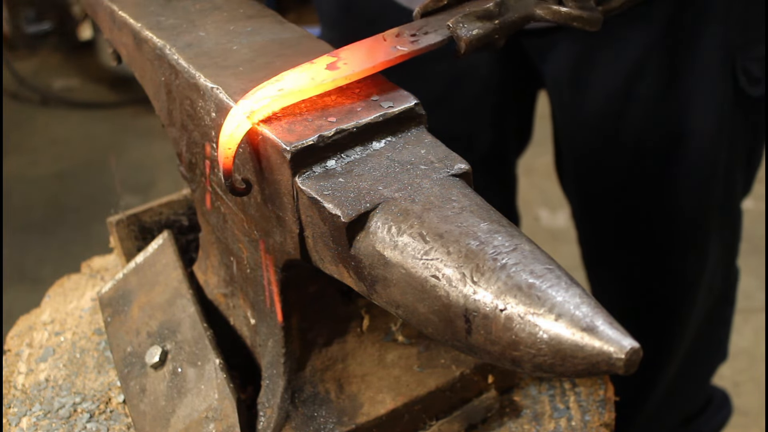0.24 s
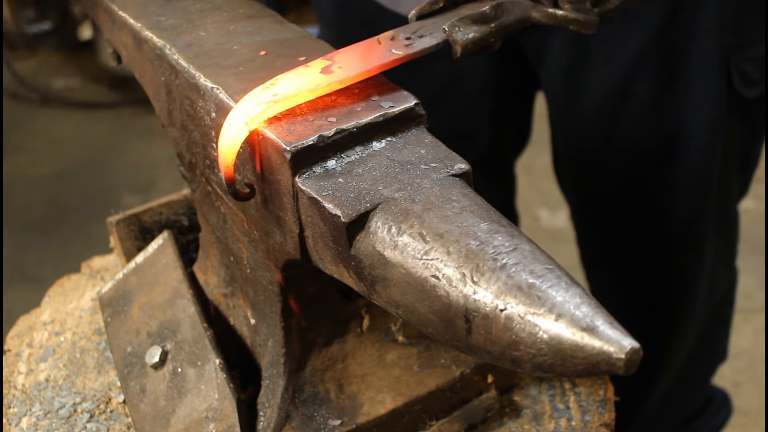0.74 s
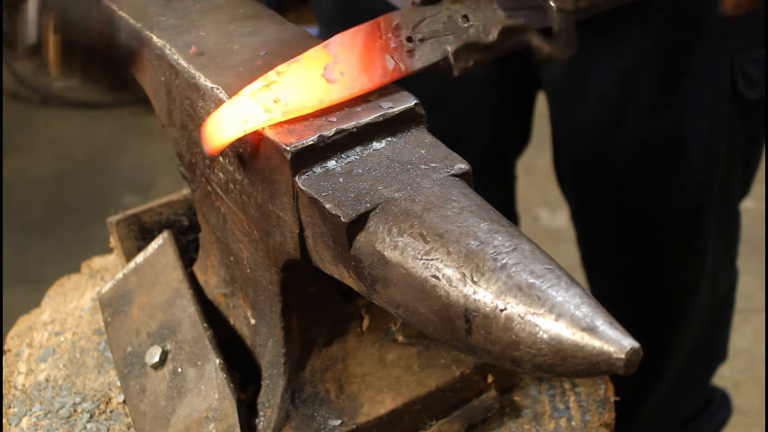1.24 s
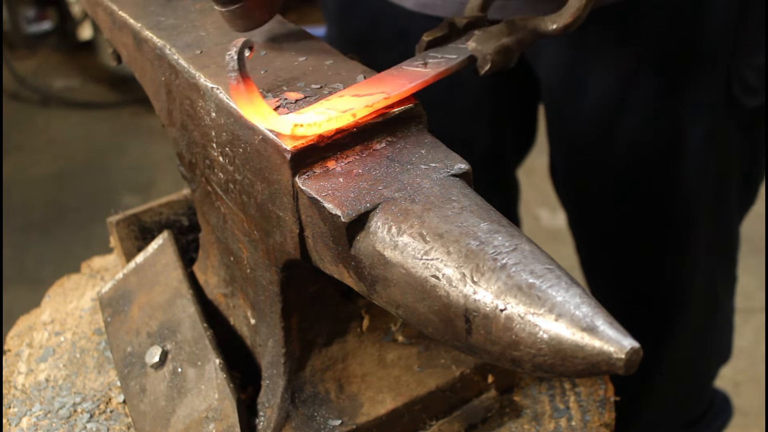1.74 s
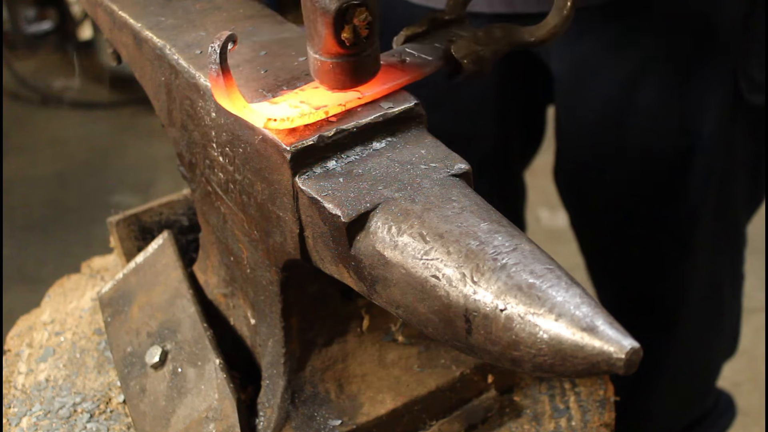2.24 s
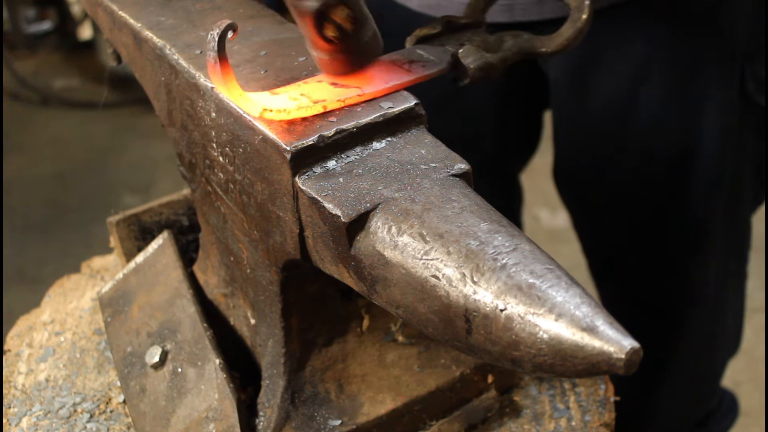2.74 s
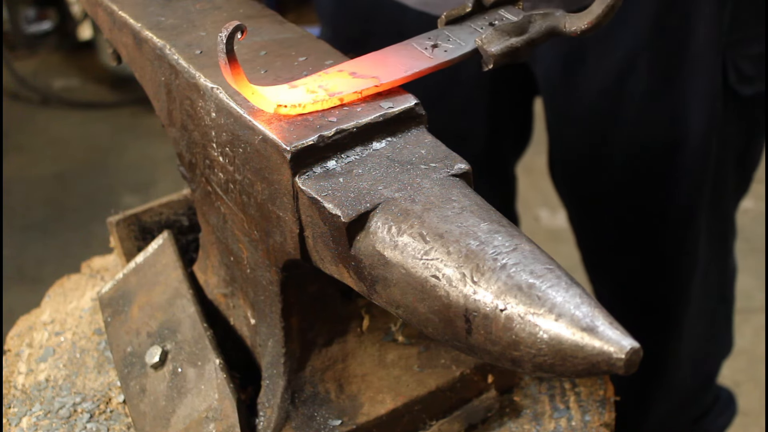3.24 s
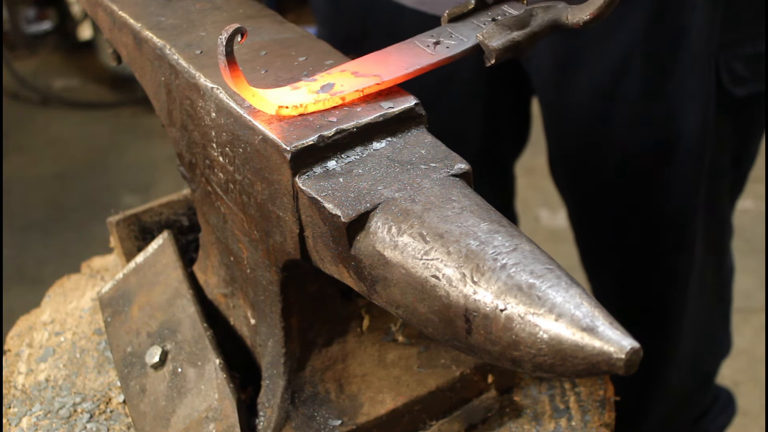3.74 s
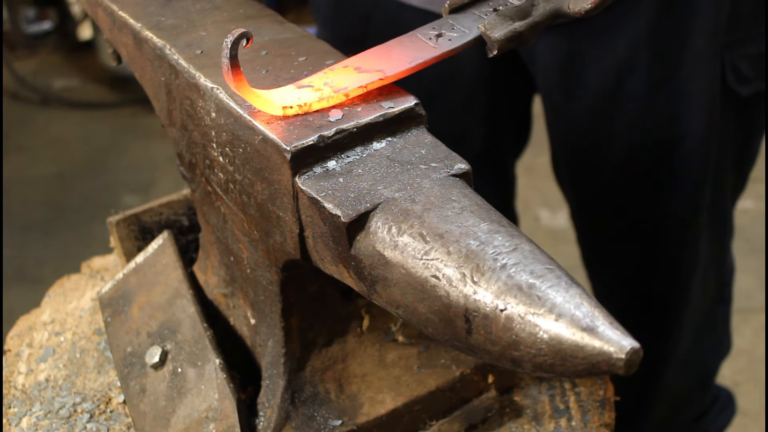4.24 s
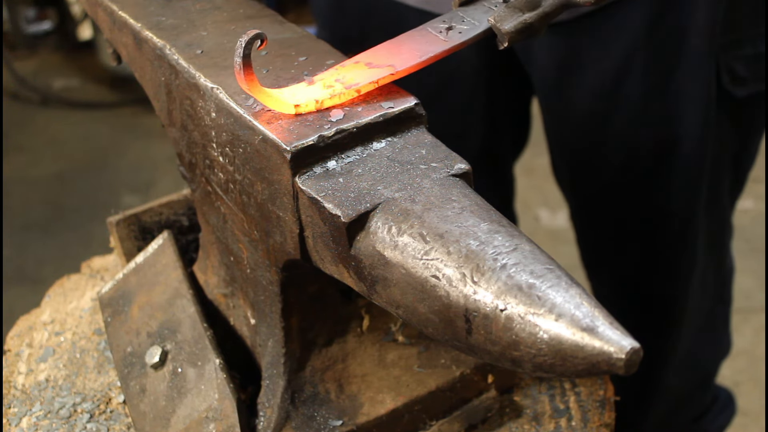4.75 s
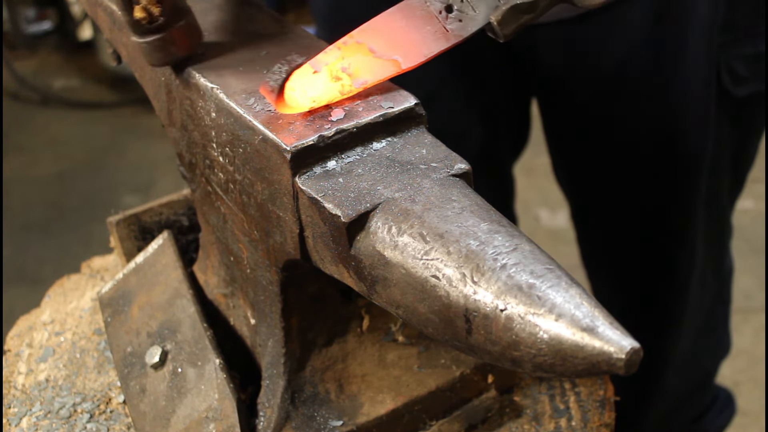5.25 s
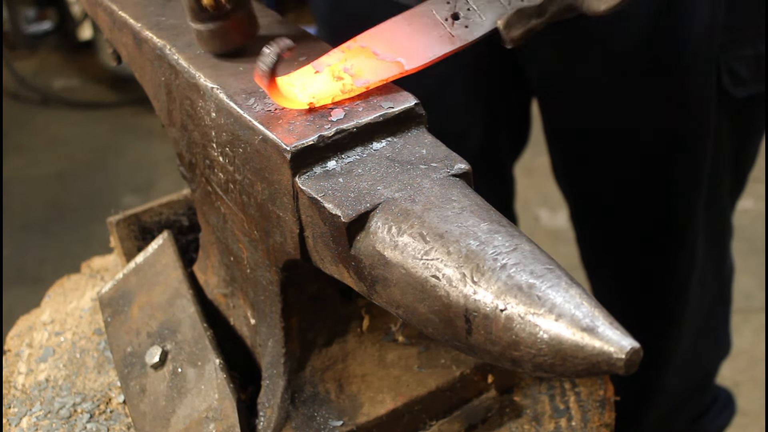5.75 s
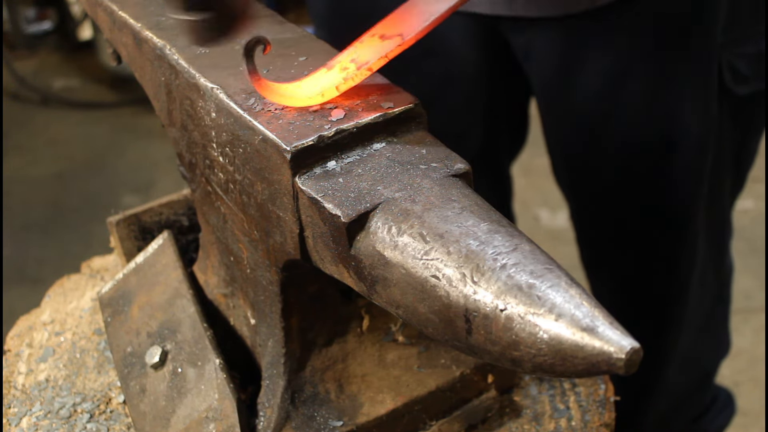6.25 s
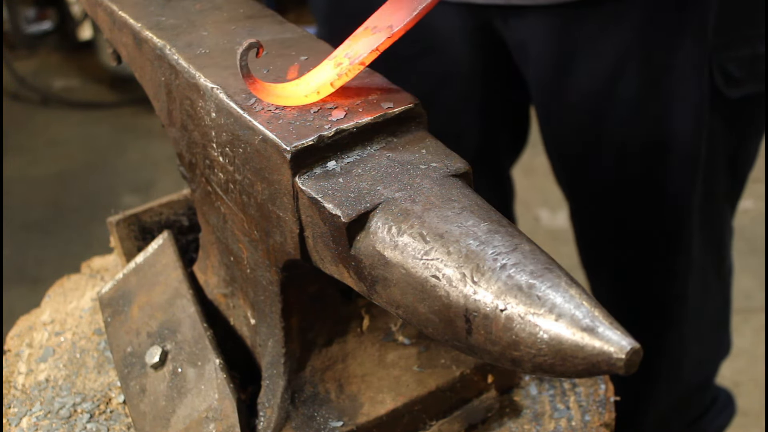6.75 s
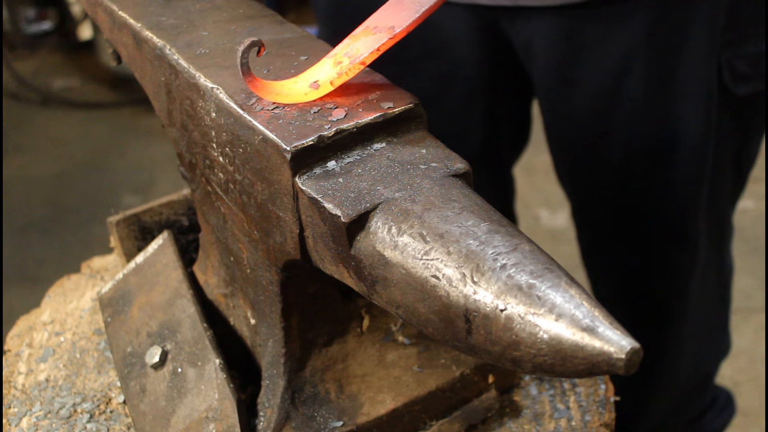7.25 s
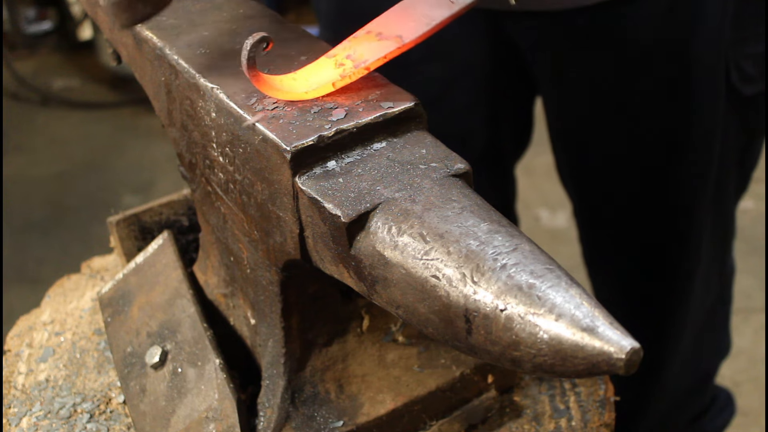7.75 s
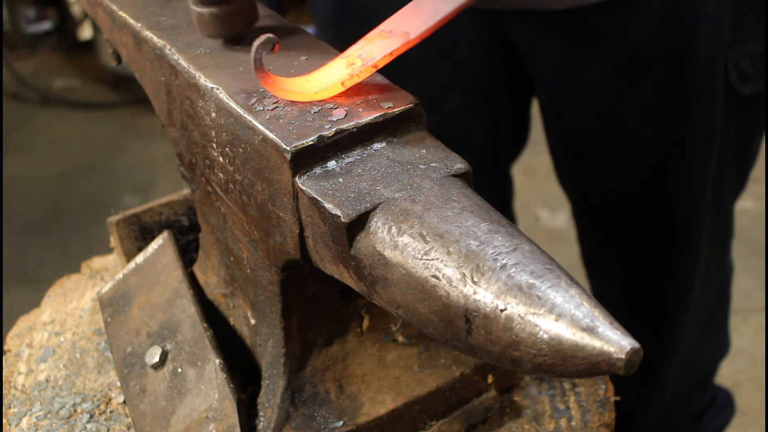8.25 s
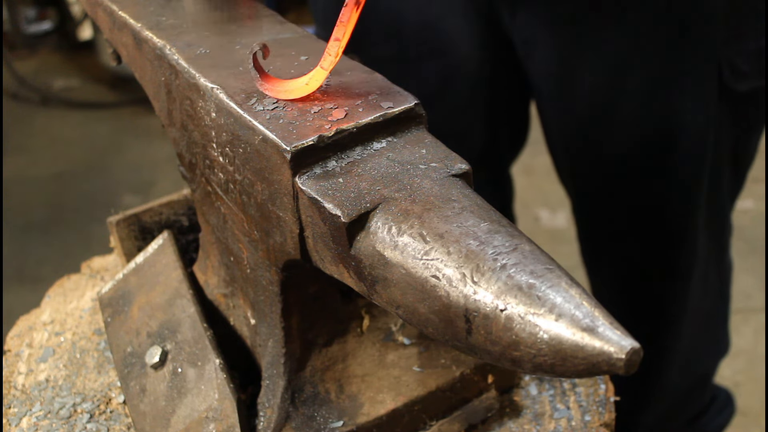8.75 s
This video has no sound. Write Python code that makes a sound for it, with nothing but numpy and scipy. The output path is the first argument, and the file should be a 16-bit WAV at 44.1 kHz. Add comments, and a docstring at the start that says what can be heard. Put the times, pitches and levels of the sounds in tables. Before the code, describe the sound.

A gas forge roars continuously, a low, fluttering, hollow rush around a few hundred hertz with a fainter hiss above. Over it, a hammer strikes hot steel at about 0.1, 0.6 and 1.1 seconds: hard, abrupt cracks with small bright clinks of loose steel around the first two. Two ringing taps on the bare anvil follow at 1.6 and 1.7, then a clear clink at 2.2 and a pause as the roar swells back. Four somewhat lighter blows fall at 3.5, 3.9, 4.4 and 4.9. A rapid, dulling bounce of taps comes at 5.2-5.4, with another tap at 5.7. Four stronger blows land at 6.3, 6.7, 7.1 and 7.6, then taps bounce at 7.95-8.15 and 8.35, before a last blow at 8.8. Rings are short and damped, with a brief hard-walled room tail. The close microphone distorts slightly on peaks, and the background ducks after loud hits.

```python
"""Small workshop: a hand hammer strikes hot steel on a damped anvil, and taps and bounces on the bare face.
Each contact is a coloured noise burst plus decaying modes of anvil and piece and a room tail; the loose
steel clinks too. A gas forge roars (noise through chamber resonances) and hisses (noise through a jet colour).
Loud peaks clip; a gain control ducks on overloads and creeps back up."""
import sys
import numpy as np
from scipy import signal
from scipy.fft import rfft, irfft, next_fast_len
from scipy.io import wavfile
from scipy.ndimage import uniform_filter1d, minimum_filter1d, map_coordinates

SR = 44100
rng = np.random.default_rng(int(sys.argv[2]) if len(sys.argv) > 2 else 0)


def transcribe(u):
    """Save the signal u as a 16-bit wav file named by the first command-line argument.

    u: samples, shape (n,) or (channels, n), limited to [-1, 1]; the rate is SR.
    q: integer samples, one column per channel.
    """
    v = np.clip(np.atleast_2d(u).T, -1, 1)
    q = np.round(v * 32767).astype(np.int16)
    wavfile.write(sys.argv[1], SR, q)


N = 397341

BURST_T60_S, TAP_T60_S = 0.014, 0.022  # blows and clinks; bare taps last longer


def amp(db):
    """Gain of a level in dB."""
    return 10 ** (np.asarray(db) / 20)


def unit(x):
    """x at rms 1."""
    return x / np.sqrt(np.mean(x ** 2) + 1e-20)


def along(points, hz):
    """Interpolate (Hz, value) points on a log frequency axis."""
    f, v = np.transpose(points)
    return np.interp(np.log(hz + 1), np.log(f + 1), v)


def wobble(rate_hz):
    """Smooth random curve with rate_hz knots a second."""
    knots = rng.standard_normal(int(N * rate_hz / SR) + 4)
    return map_coordinates(knots, [np.arange(N) * rate_hz / SR])


def filtered(x, response):
    """x times a gain response(Hz), zero phase."""
    m = next_fast_len(len(x) + 8192)
    return irfft(rfft(x, m) * response(np.fft.rfftfreq(m, 1 / SR)), m)[:len(x)]


def hump(hz, centre_hz, width_hz):
    """Shape of one resonance: 1 at its centre, half at the edges of its width."""
    return 1 / (1 + (2 * (hz - centre_hz) / width_hz) ** 2)


def lag(x, tau_s):
    """One-pole smoothing with time constant tau_s."""
    keep = np.exp(-1 / (abs(tau_s) * SR))
    return signal.lfilter([1 - keep], [1, -keep], x)


def octaves(hz, centre_hz):
    """Signed distance from centre_hz in octaves, constant under 1 kHz."""
    return np.log2(np.maximum(hz, 1000) / centre_hz)


def add(track, start_s, sound):
    """Mix a sound into the track at start_s."""
    track[round(start_s * SR):][:len(sound)] += sound


def patchy(patchy_db):
    """White noise with patches of random gain in time and frequency."""
    z = signal.stft(rng.standard_normal(N), nperseg=512)[2]
    field = uniform_filter1d(rng.standard_normal(z.shape), 5, 0)
    field = uniform_filter1d(field, 10, 1)
    return signal.istft(z * amp(patchy_db * unit(field)), nperseg=512)[1][:N]


def forge():
    """Turbulent flame excites the chamber's resonances; the gas jet adds broadband hiss."""
    # roar level over time: time_s, roar_db
    flame_levels = [(0, -9), (1.2, -6), (2.4, -11.5), (3.1, -8.5), (4.2, -6.5), (5, -10), (6, -8.5),
                    (6.6, -6), (7.5, -9.5), (9, -7)]
    # resonances of forge chamber and shop: centre_hz, nominal width_hz, level_db
    chamber_modes = [(105, 23.3, -12.5), (160.7, 32.3, -6), (215.2, 24.8, 2), (247.4, 5.5, 3.5),
                     (298.5, 39.6, 0), (335.4, 17, -2), (391, 90, -3), (457, 74, -5), (527.4, 29.8, -0.5),
                     (612, 22, -7.5), (640, 83, -10), (658, 27, -16), (757.4, 11, -10), (892, 23, -26)]
    # relative density of burner hiss: freq_hz, level_db (per Hz)
    jet_colour = [(410, -30.5), (700, -5), (1020, -13), (1120, -14), (1390, -14.5), (1800, -16),
                  (2110, -23.5), (2540, -25), (2750, -29), (3260, -29.5), (3620, -28), (7860, -36),
                  (11400, -34), (14800, -53), (16200, -52.5)]
    # resonances in the hiss: centre_hz, width_hz, lift_db
    throat_modes = [(1153, 210, 6), (1312, 23, 11), (1952, 210, 3), (2513, 70, 9), (3230, 300, 7),
                    (5500, 140, 4.5), (10400, 280, 4.5), (11600, 300, 6)]
    hiss_db, hiss_follows = -20.5, 0.63  # the hiss swings less than the roar

    def chamber(hz):
        # exponent steepens the skirts: dark valleys between resonances
        return np.sqrt(sum(amp(2 * db) * hump(hz, c, w) ** 1.84 for c, w, db in chamber_modes))

    def throat(hz):
        lift_db = sum(db * hump(hz, c, w) for c, w, db in throat_modes)
        return amp(along(jet_colour, hz) + lift_db)

    roar_db = np.interp(np.arange(N) / SR, *np.transpose(flame_levels))
    flutter_db = 0.26 * wobble(3.3) + 0.17 * wobble(40)  # the flame burns in lumps
    roar = unit(amp(flutter_db) * filtered(patchy(patchy_db=1.0), chamber))
    hiss = unit(amp(0.19 * flutter_db) * filtered(patchy(patchy_db=1.5), throat))
    return amp(roar_db) * roar + amp(hiss_db + hiss_follows * roar_db) * hiss


def echoes(t):
    """Fresh room tail of energy 1; each frequency dies at its own speed."""
    # decay of the shop: freq_hz, t60_s
    shop_decay = [(500, 0.17), (1200, 0.22), (2500, 0.25), (6000, 0.21), (11000, 0.19), (15000, 0.25)]
    hz, frame_s, z = signal.stft(rng.standard_normal(len(t)), SR, nperseg=256)
    decay = amp(-60 * frame_s / along(shop_decay, hz)[:, None])
    tail = signal.istft(z * decay, SR, nperseg=256)[1][:len(t)]
    tail = tail * (1 - np.exp(-t / 0.0019))  # the walls take a moment to answer
    return tail / np.linalg.norm(tail)


def ringing(modes, shape_db, scatter_db, blur_rad, t):
    """Modes ring as the contact excites their pitch; loose scale and clamps blur the phase (random walk)."""
    total = 0
    for hz, level_db, t60_s in modes:
        envelope = amp(level_db + shape_db(hz) + rng.normal(0, scatter_db) - 60 * t / t60_s)
        phase_blur = np.cumsum(rng.normal(0, blur_rad, len(t)))
        total = total + envelope * np.sin(2 * np.pi * hz * t + phase_blur)
    return total


def strike(shape_db, crack_t60_s, rise_s, ring_db, piece_db, room_db, thud_db=-120):
    """One contact: burst of colour shape_db(Hz), thud of the stump, ring of anvil and piece, room's answer."""
    # damped anvil modes: freq_hz, level_db, t60_s
    anvil_modes = [(1730, -3, .09), (2100, -8, .05), (2950, -6, .04), (3712, -3, .1), (4380, -8, .05),
                   (5400, -8, .06), (5750, -8, .07), (6400, -8, .08), (7600, -7, .09), (7790, -8, .08),
                   (8800, -12, .07), (9450, -12, .07), (10570, -7, .09), (11200, -9, .06),
                   (12300, -10, .06), (14060, -7, .07), (15010, -11, .06)]
    # short modes of the hot piece and its tongs: freq_hz, level_db, t60_s
    piece_modes = [(930, -6, .07), (1330, -5, .07), (1900, -8, .05), (3241, 0, .09), (3460, -4, .1),
                   (4150, -11, .08), (5450, -10, .07), (6100, -7, .13), (6840, -12, .07), (8450, -14, .08)]

    def colour(hz):
        return amp(shape_db(hz)) * np.sqrt(4000 / (hz + 100))  # equal dB = about equal power per octave

    def duller(hz):
        return colour(hz) * (4000 / (hz + 500)) ** 0.7  # the walls return less treble

    t = np.arange(SR // 3) / SR
    onset = 1 - np.exp(-t / rise_s)
    crack = filtered(rng.standard_normal(len(t)), colour) * onset * amp(-60 * t / crack_t60_s)
    thud = amp(thud_db) * np.sin(2 * np.pi * 170 * t) * np.exp(-t / 0.0022)
    # scatter: excitation and grip vary from contact to contact
    anvil = amp(ring_db) * ringing(anvil_modes, shape_db, 2, 0.099, t)
    piece = amp(piece_db) * ringing(piece_modes, shape_db, 2.5, 0.15, t)
    ring = onset * (anvil + piece)
    tail = echoes(t)
    wash = filtered(tail, duller) * (1 - np.exp(-t / 0.00086))  # many walls blend the burst
    wash = wash * np.linalg.norm(crack) / np.linalg.norm(wash)
    room = wash + signal.fftconvolve(thud + ring, tail)[:len(t)]
    return crack + thud + ring + amp(room_db) * room


def clinks():
    """Steel clinks against tongs and hammer face: bursts peaked at one pitch, with a faint ring."""
    # clinks: start_s, level_db, pitch_hz (brightest part), piece_db (ring of the piece)
    clink_list = [(0.164, 8, 8400, -20), (.641, -1, 7500, -29), (0.674, 6.5, 8050, -20.5),
                  (0.9547, -10, 12200, -27), (.99, -19, 12100, -30), (2.1758, 13.5, 5930, -18)]
    fall_db_per_octave, body_db = 17.5, -12  # body: floor from 700 Hz up to the pitch
    out = np.zeros(N + SR)
    for start_s, level_db, pitch_hz, piece_db in clink_list:
        def shape_db(hz):
            floor_db = np.where((hz > 700) & (hz < pitch_hz), body_db, -120)
            slope_db = -fall_db_per_octave * np.abs(octaves(hz, pitch_hz))
            return level_db + np.maximum(slope_db, floor_db)

        add(out, start_s, strike(shape_db, BURST_T60_S, 0.00042, ring_db=-33, piece_db=piece_db, room_db=-11.5))
    return out[:N]


def taps():
    """Hammer taps and bounces on the bare face, and two clanks on steel lying on the anvil (5.73 s, 8.36 s); a
    softer tap loses treble."""
    # taps: start_s, level_db, bright_db (per octave above treble_hz), ring_db (anvil), piece_db (piece)
    tap_list = [(1.5623, 17.5, 2.5, -9.5, -25), (1.6925, 16.5, .5, -12.5, -33), (5.2023, 11, 6, -10, -21),
                (5.29, 10.5, 0.5, -13, -21), (5.3472, 11.5, -6, -18, -28), (5.3867, -2, -18, -18.5, -22),
                (5.7277, 16, 2, -20, -14.5), (7.9532, 15, 5.5, -11.5, -23), (8.0529, 12.5, -8, -13, -23),
                (8.1376, -0.5, -22, -23, -15), (8.3581, 13, -4, -18, -10)]
    # burst colour on bare steel: freq_hz, level_db (per octave)
    bare_colour = [(500, -30.5), (1000, -3), (1600, -2.5), (2600, 0.5), (4100, -4), (6600, -16.5),
                   (10500, -22), (16000, -52)]
    treble_hz = 2600
    out = np.zeros(N + SR)
    for start_s, level_db, bright_db, ring_db, piece_db in tap_list:
        def shape_db(hz):
            tilt_db = bright_db * np.maximum(octaves(hz, treble_hz), 0)
            return level_db + along(bare_colour, hz) + tilt_db

        add(out, start_s, strike(shape_db, TAP_T60_S, 0.00053, ring_db, piece_db, room_db=-5.5))
    return out[:N]


def blows():
    """Blows on hot steel, which stops the burst fast; brightness tilts the colour about a pivot."""
    # blows: start_s, level_db, bright_db (per octave), knock_db (low knock against the colour), thud_db (stump)
    blow_list = [(0.109, 15.5, 4, 14, 11.5), (0.591, 21, -.5, -3.5, -16.5), (1.0772, 21.5, 1, 3.5, -1),
                 (3.48, 13, -1.5, -1, 0), (3.922, 13, 1.5, 11.5, -18.5), (4.403, 13.5, 4.5, 17, -2),
                 (4.929, 12, 3.5, 11.5, -13.5), (6.285, 18.5, 0, -3, -4), (6.705, 15.5, 2.5, 6, -14),
                 (7.146, 18, 2, 5, -3), (7.626, 17, 1.5, 4.5, -30), (8.834, 14.5, -1.5, -13.5, -4.5)]
    # burst colour on hot steel: freq_hz, level_db (per octave)
    hot_colour = [(500, -26.5), (1000, -8), (1600, -9.5), (2600, -4.5), (4100, -2), (6600, -1),
                  (10500, 0.5), (16000, -11.5)]
    pivot_hz, knock_hz = 4000, 1300  # the knock lies under knock_hz
    out = np.zeros(N + SR)
    for start_s, level_db, bright_db, knock_db, thud_db in blow_list:
        def shape_db(hz):
            tilt_db = bright_db * octaves(hz, pivot_hz)
            low_db = knock_db / (1 + (hz / knock_hz) ** 6)
            return level_db + along(hot_colour, hz) + tilt_db + low_db

        add(out, start_s, strike(shape_db, BURST_T60_S, 0.00017, ring_db=-27, piece_db=-25.5,
                                 room_db=-3.5, thud_db=thud_db))
    return out[:N]


def scene():
    """Sum of forge, clinks, taps and blows, one channel."""
    return (forge() + clinks() + taps() + blows())[None]


def gain_control(x, creep_s):
    """Overloads pull the gain down in a few ms; one part is held and returns fast, another creeps back."""
    over = lag(np.maximum(np.abs(x) - 0.7, 0) ** 2, 0.0079)
    hold = round(0.09 * SR)
    held = -minimum_filter1d(-over, hold, origin=(hold - 1) // 2)  # maximum of the last 90 ms
    quick = lag(held, 0.047)
    # at the start the gain still recovers from a blow just before
    earlier = amp(-27.5) * np.exp(-np.arange(N) / SR / creep_s)
    slow = lag(over, creep_s) + earlier
    gain_db = -5 * np.log10(1 + amp(43.5) * quick) - 7 * np.log10(1 + amp(58.0) * slow)
    return amp(lag(gain_db - gain_db[0], 0.0018) + gain_db[0])


def record(dry):
    """Bass cut, gain control, hard clipping at full scale, band limit."""
    top_hz = 16300
    x = signal.sosfilt(signal.butter(3, 62, "high", fs=SR, output="sos"), dry[0])
    x = np.clip(x * gain_control(x, creep_s=0.47), -1, 1)
    return filtered(x, lambda hz: np.clip((top_hz - hz) / 500, 0, 1))[None]


dry = scene()
out = record(dry)
transcribe(out)
```